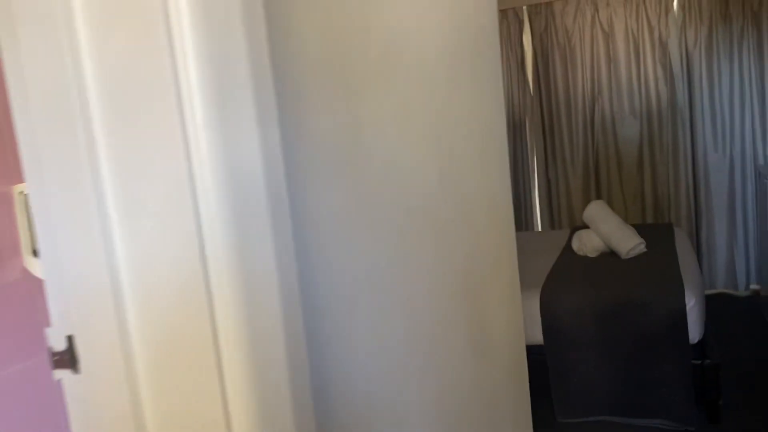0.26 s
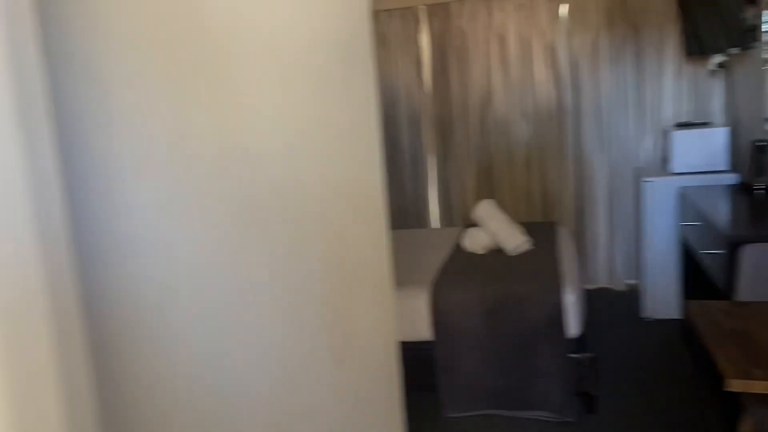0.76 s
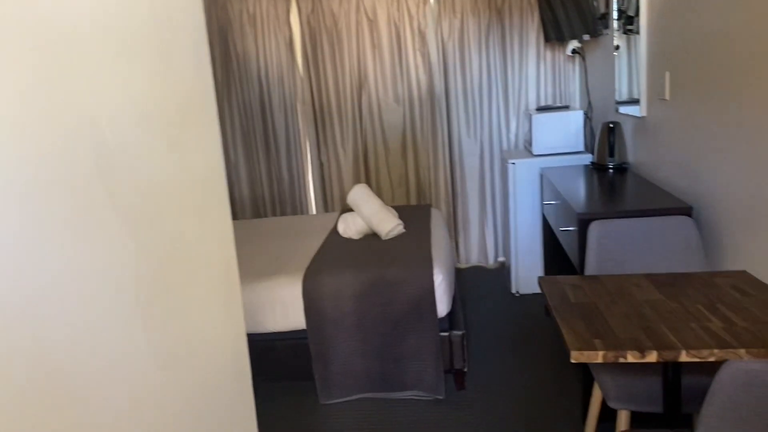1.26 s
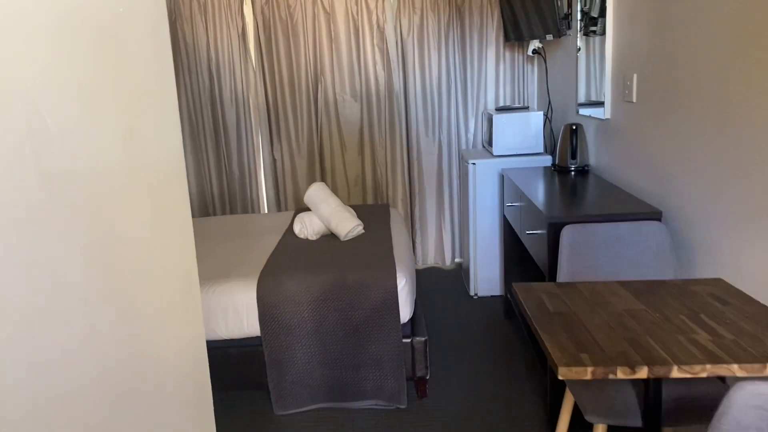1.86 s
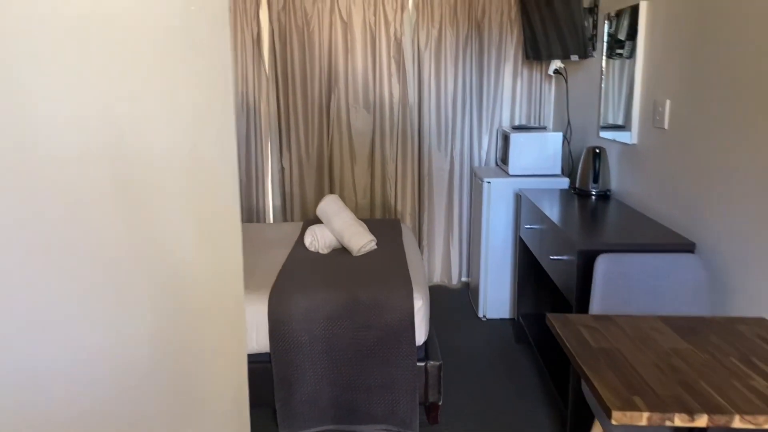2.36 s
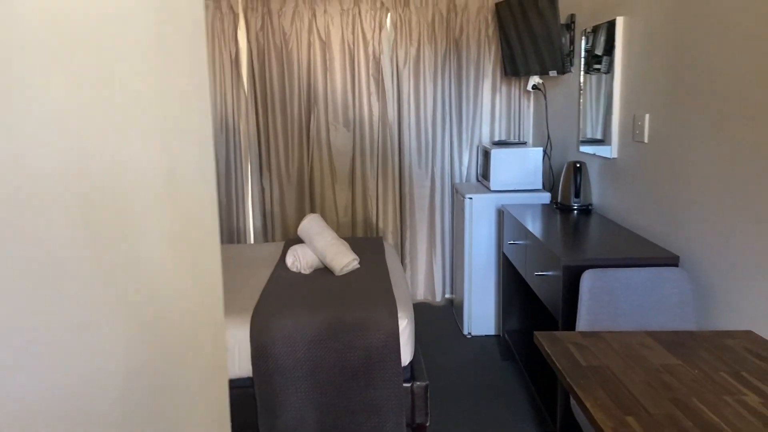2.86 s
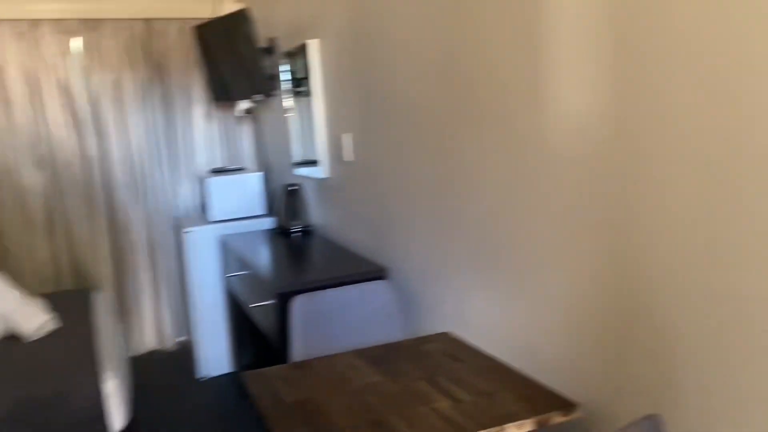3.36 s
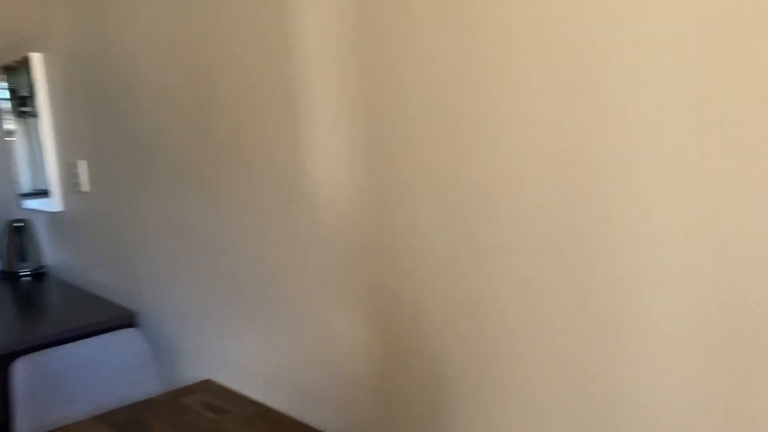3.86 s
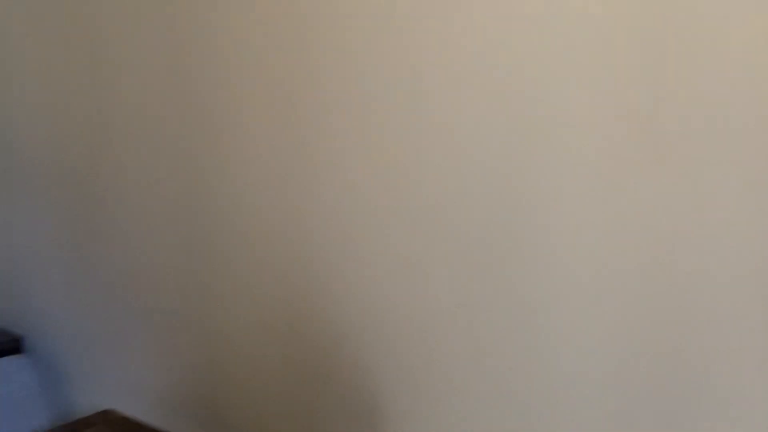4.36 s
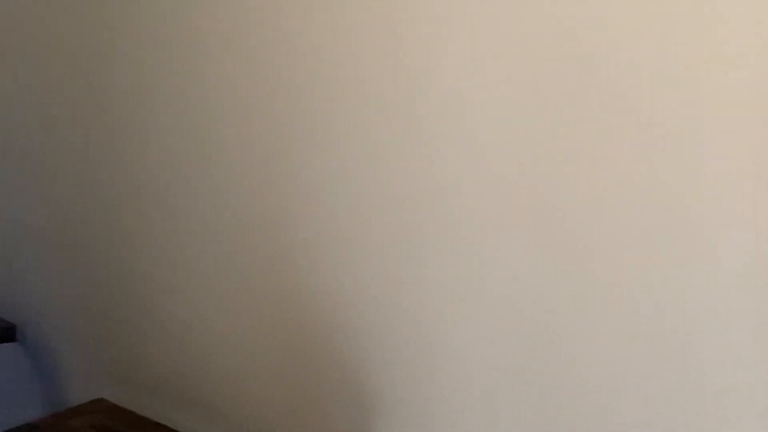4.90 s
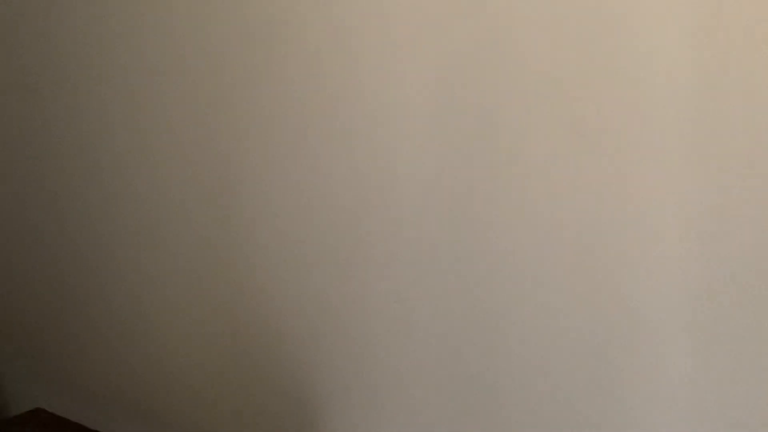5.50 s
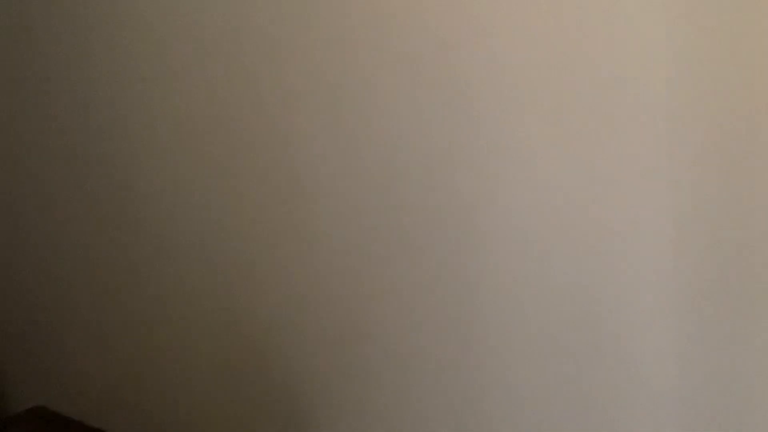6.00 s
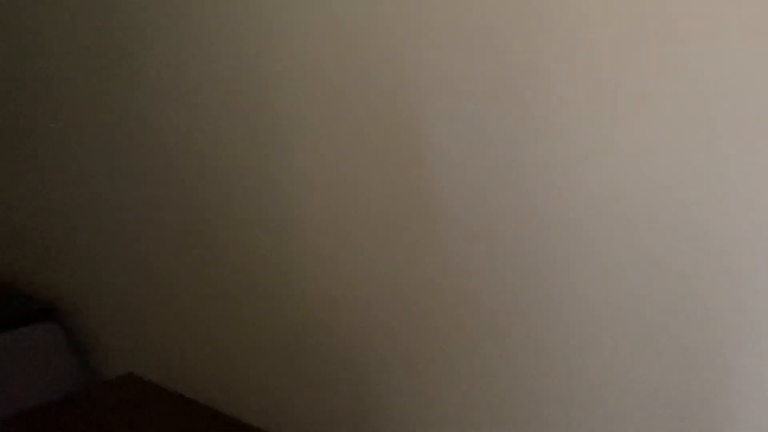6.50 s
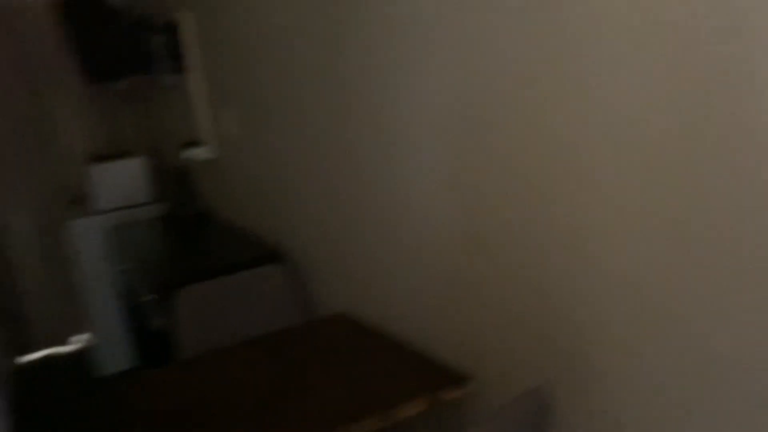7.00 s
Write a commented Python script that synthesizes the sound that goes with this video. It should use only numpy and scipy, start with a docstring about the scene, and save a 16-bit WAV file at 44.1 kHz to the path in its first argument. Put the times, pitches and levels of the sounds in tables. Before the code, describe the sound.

Scattered cane knocks and sharp clacks on furniture, with low footstep thumps and soft swishing over a quiet indoor rumble.

```python
"""A small carpeted room: someone walks through with a long cane.
The cane knocks on a wooden door and clacks against furniture, ringing their modes; loose metal clinks.
Tip and clothes swish, soles rub and a shoe scuffs: friction noise in swelling strokes.
Footfalls set the sprung floor booming; microphone handling and soft steps make dull, dry bumps.
Underneath, the building rumbles and a fridge hums."""
import sys
import numpy as np
from scipy import signal
from scipy.fft import rfft, irfft
from scipy.io import wavfile

SR = 44100
rng = np.random.default_rng(int(sys.argv[2]) if len(sys.argv) > 2 else 0)


def wav_record(signal):
    """Record a signal, one row per channel, as 16-bit PCM in the file named by sys.argv[1]."""
    frames = np.transpose(np.atleast_2d(signal))
    bounded = np.clip(frames, -1, 1)
    # unit amplitude maps onto the largest positive 16-bit level
    quanta = np.round(bounded * 32767).astype(np.int16)
    wavfile.write(sys.argv[1], SR, quanta)


N = 319548
TIME = np.arange(N) / SR
AGE = np.arange(SR * 3 // 4) / SR   # seconds since a blow


def from_db(db):
    """Decibels to amplitude."""
    return 10 ** (np.asarray(db) / 20)


def unit_energy(x):
    """Scales to a sum of squares of 1."""
    return x / np.sqrt(np.sum(x ** 2) + 1e-20)


def at_hz(points, hz):
    """Reads a table on a log-frequency axis."""
    known_hz, values = np.transpose(points)
    return np.interp(np.log(np.maximum(hz, 1)), np.log(known_hz), values)


def butter(x, hz, kind, order=2):
    """Butterworth low-pass or high-pass."""
    return signal.sosfilt(signal.butter(order, min(hz, .45 * SR), kind, fs=SR, output="sos"), x + 1e-18)


def colour(x, spectrum, size=8192):
    """Minimum-phase filter with the given spectrum."""
    gain = from_db(at_hz(spectrum, np.arange(size // 2 + 1) * SR / size))
    cepstrum = irfft(np.log(gain))
    cepstrum[1:size // 2] *= 2
    response = irfft(np.exp(rfft(cepstrum[:size // 2], size)))
    return signal.fftconvolve(x, response)[:len(x)]


def noise(spectrum, grain_db=0):
    """Coloured noise of rms 1; grain_db makes its tiny slips uneven."""
    slips = rng.standard_normal(N + SR) * from_db(grain_db * rng.standard_normal(N + SR))
    return unit_energy(colour(slips, spectrum)[SR:]) * np.sqrt(N)


def flutter(per_s):
    """Slow random wavering, spread about 1."""
    return np.interp(TIME * per_s, np.arange(N), rng.standard_normal(N))


def add(track, start_s, sound):
    """Mixes a sound in at start_s."""
    start = int(round(start_s * SR))
    track[start:start + len(sound)] += sound[:len(track) - start]


def ring(modes, uneven_db):
    """Decaying modes; each blow shares its energy among them a little differently."""
    out = 0
    for hz, db, t60_s in modes:
        envelope = from_db(db + uneven_db * rng.standard_normal() - 60 * AGE / t60_s)
        out += envelope * np.sin(2 * np.pi * hz * AGE) * rng.choice([-1, 1])
    return unit_energy(out)


def favour(modes, centre_hz, octaves):
    """The struck spot favours modes near one pitch: 6 dB down at a distance of `octaves`."""
    return [(hz, db - 6 * abs(np.log2(hz / centre_hz)) / octaves, t60_s) for hz, db, t60_s in modes]


def chatter(decay_s):
    """An unpitched contact that breaks up into ever smaller touches."""
    fade = np.exp(-AGE / decay_s) + 1e-12
    touches = rng.standard_normal(len(AGE)) * fade
    for _ in range(4):   # flatten the spectrum, keep the fade
        flat_spectrum = np.exp(1j * np.angle(rfft(touches)))
        touches = irfft(flat_spectrum, len(AGE)) * fade ** .25
    return unit_energy(touches)


# Room decay. Each row: band centre in Hz, T60 in seconds.
ROOM_DECAY = [(100, 0.72), (300, 0.44), (800, 0.38), (2000, 0.35), (5000, 0.33), (9000, 0.3), (15000, 0.3)]

def impact(chatter_s, wet_db, echo_db, echo_s, scatter_s=.0015):
    """A white blow of unit energy: contact, diffuse room tail and scattered ceiling echo."""
    white = rfft(rng.standard_normal(len(AGE)))
    hz = np.linspace(1, SR / 2, len(white))
    tail = 0
    for band_hz, t60_s in ROOM_DECAY:
        share = at_hz([(centre, float(centre == band_hz)) for centre, _ in ROOM_DECAY], hz)
        tail += irfft(white * share, len(AGE)) * from_db(-60 * AGE / t60_s)
    build_up = 1 - np.exp(-AGE / (.00048 + chatter_s))
    out = chatter(chatter_s) + from_db(wet_db) * unit_energy(tail * build_up)
    add(out, echo_s, from_db(echo_db) * chatter(chatter_s + scatter_s))
    return unit_energy(out)


# Spectrum of a blow on the door. Each row: frequency in Hz, gain in dB.
DOOR_SPECTRUM = [(100, 8.5), (300, 10.5), (410, 3.5), (520, 10.5), (750, 10.5), (1000, 6), (1200, 3.5),
                 (1600, 1.5), (2100, -2), (2900, -7), (4500, -9), (7000, -7), (10000, -11.5), (15000, -11)]
# Door panel modes. Each row: frequency in Hz, level in dB, T60 in seconds.
PANEL_MODES = [(524, -5, .35), (576, -9, .45), (680, -4, .22), (750, 2, .28), (840, -4, .31),
               (910, -2, .24), (998, -3, .25), (1113, -9, .25), (1437, -12, .33), (1563, -16, .35),
               (1728, -18, .3), (1954, -18, .3)]
# Cane on the door. Each row: start in seconds, energy in dB, contact low-pass in Hz, high-pass in Hz,
# relative panel ring in dB, chatter decay in seconds.
DOOR_KNOCKS = [(0.1082, 5, 2380, 1490, -9, 0.001), (0.1097, 10, 1600, 584, -7, 0.0024),
               (0.1182, 6, 1090, 516, -1.5, 0.00054), (0.12, 1.5, 164, 99, -26, 0.0097),
               (0.703, -14.5, 1400, 696, -20, 0.0013), (0.771, -14, 3200, 900, -14, 0.0006),
               (0.772, -4.5, 634, 330, -8, 0.0029), (0.7807, -2, 600, 280, -20, 0.00064)]

def door_knocks():
    """Blunt blows on a hollow panel: the softer the contact, the duller the knock."""
    out = np.zeros(N)
    for start_s, db, contact_hz, highpass_hz, ring_db, chatter_s in DOOR_KNOCKS:
        blow = colour(impact(chatter_s, wet_db=2, echo_db=-8.5, echo_s=.0092), DOOR_SPECTRUM)
        knock = unit_energy(butter(butter(blow, contact_hz, "low"), highpass_hz, "high"))
        panel = from_db(ring_db) * ring(PANEL_MODES, uneven_db=1)
        add(out, start_s, from_db(db) * (knock + panel))
    return out


# Spectrum of a blow on furniture. Each row: frequency in Hz, gain in dB.
CLACK_SPECTRUM = [(150, 14), (500, 3), (1000, -0.5), (1700, -0.5), (2400, -1), (3400, -4), (4300, -2),
                  (5700, -2), (6800, -4.5), (9500, 0), (12000, -3.5), (15500, -5)]
# Shaft resonances. Each row: centre in Hz, width in Hz, gain in dB.
SHAFT_BANDS = [(930, 49, -10), (1400, 120, -11), (1800, 210, -14), (3320, 310, -2.5), (4520, 81, -2.5),
               (4930, 230, -14), (6800, 540, -2), (9000, 230, -30)]

def clack(contact_hz, highpass_hz, chatter_s):
    """One contact of the hollow shaft, which lifts a few bands; harder is brighter."""
    blow = colour(impact(chatter_s, wet_db=1.5, echo_db=0, echo_s=.009), CLACK_SPECTRUM)
    tube = sum(from_db(db) * signal.lfilter(*signal.iirpeak(hz, hz / width_hz, fs=SR), blow + 1e-18)
               for hz, width_hz, db in SHAFT_BANDS)
    softened = butter(blow + tube, contact_hz, "low")
    return unit_energy(butter(softened, highpass_hz, "high", order=1))


# Furniture body modes. Each row: frequency in Hz, level in dB, T60 in seconds.
BODY_MODES = [(172, 0, .23), (200, -7, .18), (268, -1, .26), (296, -1, .24), (357, -5, .3), (511, -7, .3),
              (877, -8, .22), (935, -9, .2), (1217, -10, .28), (1317, -9, .28), (1750, -8, .22),
              (2013, -9, .24), (3350, -8, .2), (3520, -8, .2)]
# Cane on furniture. Each row: start in seconds, energy in dB, contact low-pass in Hz, high-pass in Hz,
# chatter decay in seconds, thud energy in dB, thud pitch in Hz.
FURNITURE_CLACKS = [(0.149, -14.5, 9000, 3000, 0.045, -45, 200),
                    (1.689, -12.5, 2800, 250, 0.028, -15.5, 200),
                    (1.921, -22.5, 2150, 800, 0.0012, -48, 300),
                    (3.610, -10, 10700, 1500, 0.0033, -7.5, 400), (3.613, 1.5, 1660, 1280, 0.0065, -1, 188),
                    (3.853, -15, 2500, 650, 0.0097, -20.5, 300), (4.079, -19.5, 4500, 900, 0.022, -36, 300),
                    (4.629, -10.5, 7050, 700, 0.0033, -28, 280),
                    (4.6421, -4.5, 5100, 910, 0.0023, -11.5, 280),
                    (5.564, 0.5, 11000, 705, 0.0023, -23, 270), (5.5844, 1, 12000, 900, 0.0017, -4.5, 270),
                    (5.589, 1, 5000, 600, 0.0046, -4.5, 170),
                    (6.1555, -6.5, 7500, 4470, 0.0015, -14.5, 280),
                    (7.014, -21, 1700, 1000, 0.032, -42, 300)]

def furniture_clacks(touch_lead_s=.0032, touch_db=-10.5, thud_lag_s=.0083):
    """The tip touches, the shaft lands and rings the upper modes, then its push makes the body thud."""
    out = np.zeros(N)
    for start_s, db, contact_hz, highpass_hz, chatter_s, thud_db, thud_hz in FURNITURE_CLACKS:
        body = from_db(-15.5) * ring(favour(BODY_MODES, centre_hz=1100, octaves=1.2), uneven_db=1.5)
        boom = from_db(5.5) * ring(favour(BODY_MODES, thud_hz, octaves=.35), uneven_db=1.5)
        push = clack(contact_hz=800, highpass_hz=200, chatter_s=.011)
        touch = clack(contact_hz, highpass_hz, .0011 + chatter_s / 2)
        landing = clack(contact_hz, highpass_hz, chatter_s)
        add(out, start_s - touch_lead_s, from_db(db + touch_db) * touch)
        add(out, start_s, from_db(db) * (landing + body))
        add(out, start_s + thud_lag_s, from_db(thud_db) * unit_energy(push + boom))
    return out


# Modes of the metal part. Each row: frequency in Hz, level in dB, T60 in seconds.
CLINK_MODES = [(2697, -7, .19), (3526, -8, .3), (4393, 0, .36), (4480, -5, .22), (4683, -6, .3),
               (6589, 0, .27), (6720, -5, .18), (7682, -9, .18), (7822, -8, .16), (9238, -6, .3),
               (12150, -6, .24)]
# Loose metal. Each row: start in seconds, level in dB, pitch centre in Hz, spread in octaves,
# relative long ring in dB.
METAL_CLINKS = [(0.718, -18, 6600, 0.2, -14), (0.729, -24, 6600, 0.088, -23),
                (2.0612, -13.5, 4300, 0.88, -7), (2.068, -17, 7440, .7, -5)]

def metal_clinks(chink_decay_s=.0078):
    """A small metal part is struck: a tick, a short chink and a longer ring."""
    out = np.zeros(N)
    for start_s, db, centre_hz, octaves, ring_db in METAL_CLINKS:
        metal = ring(favour(CLINK_MODES, centre_hz, octaves), uneven_db=1)
        blow = impact(chatter_s=.00075, wet_db=1.5, echo_db=-36, echo_s=.0102)
        tick = unit_energy(butter(butter(blow, centre_hz * .39, "high"), centre_hz * 1.13, "low"))
        damped = metal * np.exp(-AGE / chink_decay_s)
        chink = unit_energy(signal.fftconvolve(blow, damped)[:len(AGE)])
        clink = from_db(ring_db) * metal + from_db(-4) * chink + from_db(-7) * tick
        add(out, start_s, from_db(db) * clink)
    return out


# Steps. Each row: start in seconds, peak in dB, settled pitch in Hz, time to peak in seconds.
FOOTFALLS = [(0.138, -16, 45.4, 0.048), (0.765, -34, 60.6, 0.013), (0.956, -36.5, 62.3, 0.015),
             (1.681, -28.5, 46.8, 0.06), (3.150, -35, 65.1, 0.088), (3.311, -31.5, 72.3, 0.027),
             (3.488, -36.5, 52.2, 0.038), (3.603, -38.5, 81.3, 0.039), (3.868, -18.5, 48, 0.042),
             (4.066, -39, 64, 0.033), (5.566, -32.5, 44.2, 0.067), (6.905, -35, 46.9, 0.07)]

def footfalls(sag_s=.017):
    """Weight rolls onto the sprung floor; its lowest mode swells, sags in pitch under load and dies."""
    out = np.zeros(N)
    for start_s, db, hz, swell_s in FOOTFALLS:
        weight = (AGE / swell_s * np.exp(1 - AGE / swell_s)) ** 2
        pitch_hz = hz * (1 + .5 * np.exp(-AGE / sag_s))
        add(out, start_s, from_db(db) * weight * np.sin(2 * np.pi * np.cumsum(pitch_hz) / SR))
    return out


# Microphone handling and soft steps. Each row: start in seconds, energy in dB, pitch in Hz.
DULL_BUMPS = [(1.4993, -20.5, 700), (3.205, -18.5, 755), (3.222, -20.5, 600), (3.237, -17, 450),
              (3.33, -8, 158), (3.359, -10.5, 223), (5.1162, -13.5, 660), (5.121, -13.5, 169),
              (6.908, -20, 302), (7.205, -21, 294), (7.232, -23.5, 278)]

def dull_bumps(decay_cycles=.36):
    """Dull, dry bumps of microphone handling and soft steps: heavily damped tones."""
    out = np.zeros(N)
    for start_s, db, hz in DULL_BUMPS:
        bump = np.sin(2 * np.pi * hz * AGE) * np.exp(-AGE * hz / decay_cycles)
        add(out, start_s, from_db(db) * unit_energy(butter(bump, hz * 1.12, "low", order=4)))
    return out


def stroke_power(peak_s, db, rise_s, fall_s, drop_db=10.5, roundness=1.34):
    """Power of one stroke, drop_db down at rise_s before and fall_s after its peak."""
    away = np.maximum((peak_s - TIME) / rise_s, (TIME - peak_s) / fall_s)
    return from_db(db - drop_db * np.minimum(away, 10) ** roundness) ** 2


def press_power(rows):
    """Summed power of strokes with equal rise and fall."""
    return sum(stroke_power(peak_s, db, length_s / 2, length_s / 2) for peak_s, db, length_s in rows)


# Spectra of shoe friction. Each row: frequency in Hz, gain in dB.
RUB_SPECTRUM = [(150, -14), (240, -0.5), (340, 1), (450, -6), (700, -13.5), (1200, -21), (3200, -27),
                (4200, -40.5), (8000, -55)]
SCUFF_SPECTRUM = [(70, -0.5), (130, 3), (190, 5), (260, -3.5), (360, -2), (550, -12.5), (900, -19.5),
                  (2200, -24.5), (5000, -36), (12000, -58)]
# Shoe strokes. Each row: time of peak pressure in seconds, rms in dB, length in seconds.
SOLE_RUBS = [(0.0, -50.5, 0.32), (0.63, -48.5, 0.62), (1.18, -56, 0.44), (1.75, -52.5, 0.5),
             (2.50, -52.5, 0.37), (3.46, -52, 0.55), (4.25, -48.5, 0.3), (4.76, -54.5, 0.49),
             (5.02, -56.5, 0.26), (5.22, -58.5, 0.37), (5.72, -52, 0.37), (6.39, -57, 0.54),
             (7.24, -50.5, 0.24)]
SHOE_SCUFFS = [(4.107, -38.5, 0.12), (4.168, -31.5, 0.089)]

def shoe_friction(rest_db=-68):
    """Soles rub over the carpet; a shoe catches and drags."""
    rub_level = np.sqrt(from_db(rest_db) ** 2 + press_power(SOLE_RUBS))
    rub = rub_level * from_db(1.2 * flutter(25)) * noise(RUB_SPECTRUM)
    scuff = np.sqrt(press_power(SHOE_SCUFFS)) * noise(SCUFF_SPECTRUM, grain_db=-.5)
    return rub + scuff


# Hard surfaces near the microphone. Each row: delay in seconds, gain in dB.
NEAR_ECHOES = [(.0013, -22), (.0029, -17.5), (.0047, -12.5)]

def reflect(x):
    """Short echoes comb the sound at about constant energy."""
    samples = np.arange(len(x))
    echoes = sum(from_db(db) * np.interp(samples - delay_s * SR, samples, x, left=0)
                 for delay_s, db in NEAR_ECHOES)
    return (x + echoes) / np.sqrt(1 + sum(from_db(db) ** 2 for _, db in NEAR_ECHOES))


# Spectrum of the swish. Each row: frequency in Hz, gain in dB.
SWISH_SPECTRUM = [(300, -4), (600, -3.5), (1500, -2.5), (3000, -3.5), (4500, -7), (6500, -9), (9500, -9.5),
                  (12000, -17), (16000, -20.5)]
# Tip and clothes strokes. Each row: time of top speed in seconds, level in dB, rise in seconds,
# fall in seconds, relative treble in dB.
SWISH_STROKES = [(0.0, -55, .05, 0.082, -5.5), (0.70, -53, 0.37, 0.089, -2.5),
                 (1.10, -58, 0.089, 0.34, -9.5), (1.41, -58, .11, 0.16, -1), (1.72, -63, 0.045, 0.15, 3),
                 (2.04, -61, 0.11, 0.28, -2.5), (2.38, -61.5, .08, 0.18, -12),
                 (3.18, -64.5, .08, 0.61, -1.5), (3.58, -57, 0.27, 0.19, -6), (4.08, -56, 0.19, 0.37, -0.5),
                 (4.39, -53, 0.25, 0.25, 0), (4.64, -54.5, 0.19, .2, 0), (4.94, -53, 0.052, 0.12, -1.5),
                 (5.23, -50.5, .13, 0.28, -5.5), (5.44, -50.5, 0.29, 0.13, 4),
                 (6.3, -66.5, 0.88, 0.43, -2.5), (6.77, -58.5, 0.11, 0.18, 1.5),
                 (6.97, -59, 0.15, 0.26, 3.5)]

def swishes(rest_mid_db=-75, rest_treble_db=-79, crossover_hz=4080):
    """Tip and clothes sweep past, each stroke with its own brightness; clothes never keep quite still."""
    mid_power, treble_power = from_db(rest_mid_db) ** 2, from_db(rest_treble_db) ** 2
    for peak_s, db, rise_s, fall_s, treble_db in SWISH_STROKES:
        stroke = stroke_power(peak_s, db, rise_s, fall_s)
        mid_power += stroke
        treble_power += stroke * from_db(treble_db) ** 2
    hiss = reflect(noise(SWISH_SPECTRUM, grain_db=2))
    mid = np.sqrt(mid_power) * butter(hiss, crossover_hz, "low", order=5)
    treble = np.sqrt(treble_power) * butter(hiss, crossover_hz, "high", order=5)
    return from_db(.5 * flutter(32)) * (mid + treble)


# Spectrum of the building rumble. Each row: frequency in Hz, gain in dB.
RUMBLE_SPECTRUM = [(20, -34.5), (31, -13.5), (46, -1.5), (62, 1), (90, -15), (125, -11.5), (190, -23.5),
                   (450, -40.5), (800, -36.5), (1500, -41), (4000, -59), (16000, -83)]

def room_tone(rumble_db=-46, hum_hz=126.7, hum_db=-60):
    """The building rumbles; a fridge hums, wavering in phase and level."""
    phase = 2 * np.pi * hum_hz * TIME + .9 * flutter(6)
    hum = np.sqrt(2) * np.sin(phase) * from_db(2.5 * flutter(4))
    return from_db(rumble_db) * noise(RUMBLE_SPECTRUM) + from_db(hum_db) * hum


def scene():
    """Mono sum of all sources."""
    bed = room_tone() + swishes() + shoe_friction()
    return (bed + door_knocks() + furniture_clacks() + metal_clinks() + footfalls() + dull_bumps())[None]


def record(dry, bass_hz=28, top_hz=15900):
    """The microphone loses the deepest bass; the top is cut steeply."""
    steep_lowpass = signal.ellip(10, .1, 80, top_hz, fs=SR, output="sos")
    return signal.sosfilt(steep_lowpass, butter(dry, bass_hz, "high"))


dry = scene()
out = record(dry)
wav_record(out)
```